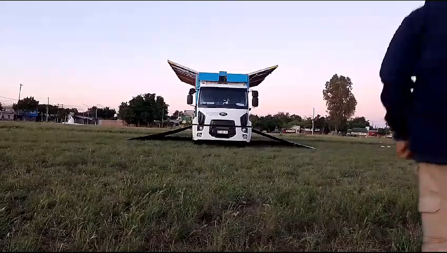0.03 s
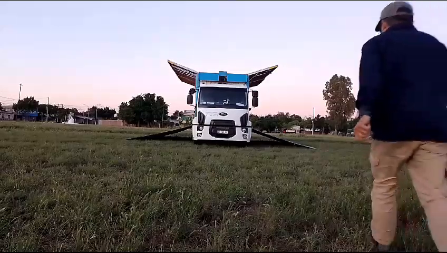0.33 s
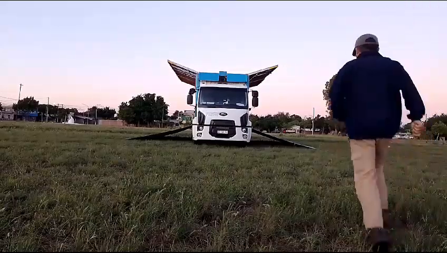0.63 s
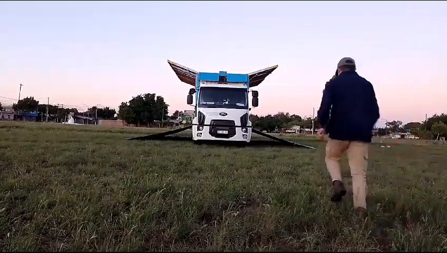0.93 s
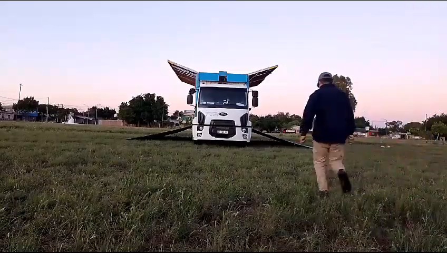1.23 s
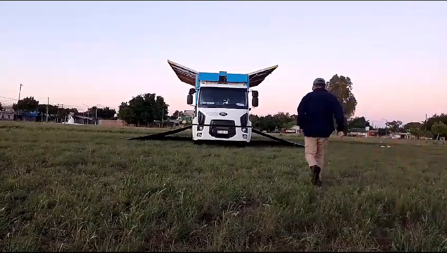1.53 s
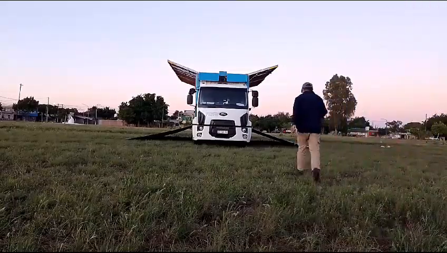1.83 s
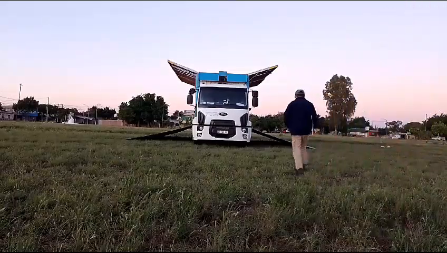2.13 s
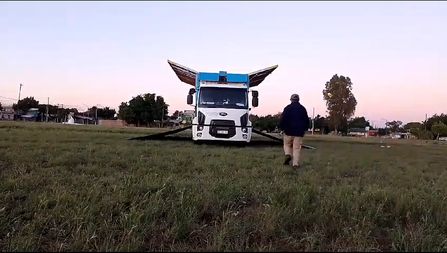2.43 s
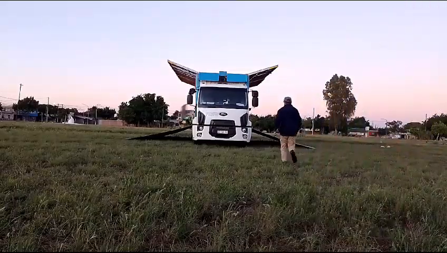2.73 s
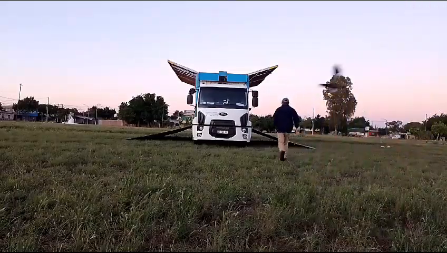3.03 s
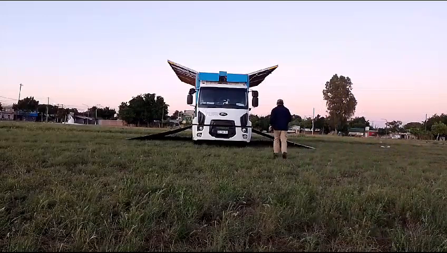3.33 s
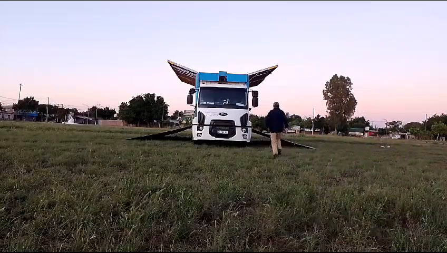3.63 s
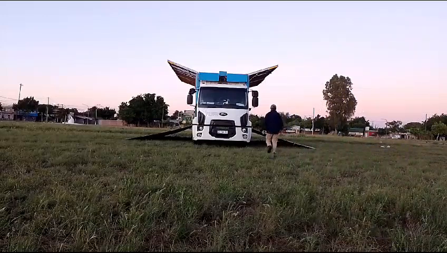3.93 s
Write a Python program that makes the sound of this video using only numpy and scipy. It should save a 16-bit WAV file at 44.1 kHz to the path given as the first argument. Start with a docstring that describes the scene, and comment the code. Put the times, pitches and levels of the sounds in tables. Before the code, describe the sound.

A bird gives repeated harsh, reedy squawks, growing louder and brighter as it nears, while a second bird sometimes overlaps. Faint footsteps swish away through grass early on, in a quiet open field with a slight echo.

```python
"""Two birds squawking over a grass field

Open field, quiet air, one microphone feeding both channels. Two birds squawk; one flies closer and
gets louder and brighter. Each squawk is a reedy stack of harmonics that starts with a fast trill and
a rasp, clears, and drops in pitch at its end. Someone walks away through the grass, and a faint echo
of the birds comes back from the edge of the field."""
import sys
import numpy as np
from scipy import signal
from scipy.fft import rfft, irfft
from scipy.io import wavfile

SR = 44100
rng = np.random.default_rng(int(sys.argv[2]) if len(sys.argv) > 2 else 0)


def persist_wave(psi):
    """Save psi, clipped to +-1, as 16-bit WAV."""
    counts = np.round(np.clip(psi, -1, 1) * 32767).astype(np.int16)
    wavfile.write(sys.argv[1], SR, np.atleast_2d(counts).T)


N = 176400
TIME = np.arange(N) / SR

# Bright spectrum of air in the throat, also of the scatter off the grass: frequency_hz, level_db
HISS_SPECTRUM = [(300,-27),(700,-6),(1400,-25.5),(2200,11),(4000,1.5),(6000,2.5),(10000,9),(15000,-21)]


def from_db(db):
    """Decibels to gain."""
    return 10 ** (np.asarray(db) / 20)


def db_at(spectrum, hz):
    """Level of a spectrum at hz, interpolated on a log-frequency axis."""
    table = np.array(spectrum)
    return np.interp(np.log(hz + 1e-9), np.log(table[:, 0]), table[:, 1])


def noise(spectrum, size=N):
    """Coloured noise of rms 1."""
    gain = from_db(db_at(spectrum, np.fft.rfftfreq(size, 1 / SR)))
    coloured = irfft(rfft(rng.standard_normal(size)) * gain, size)
    return coloured / coloured.std()


def drift(hz, size):
    """Smooth random wander with a spread of about 1, rolling off above hz."""
    hop, settle = 20, 1000
    pole = np.exp(-2 * np.pi * hz * hop / SR)
    white = rng.standard_normal(size // hop + settle + 2)
    smooth = signal.lfilter([1], [1, -2 * pole, pole * pole], white)
    return np.interp(np.arange(size) / hop + settle, np.arange(len(smooth)), smooth / smooth.std())


def phase_of(hz):
    """Running phase in radians of a changing frequency."""
    return 2 * np.pi * np.cumsum(hz) / SR


def open_air():
    """Quiet, steady air over the field, mostly low rumble."""
    # Outdoor background: frequency_hz, level_db
    air_spectrum = [(20,-13),(50,-2),(70,-9.5),(110,-5.5),(160,-19),(240,-13),(600,-13.5),(1400,-13.5),(2300,-14),(4100,-20),(5200,-29),(8600,-23),(12000,-31.5),(16000,-49)]
    return from_db(-69) * noise(air_spectrum)


def bursts(events, spectrum):
    """Short bursts of noise that start at once and die away."""
    envelope = sum(from_db(db) * (TIME >= start_s) * np.exp(-np.minimum(abs(TIME - start_s) / decay_s, 20))
                   for start_s, db, decay_s in events)
    return envelope * noise(spectrum)


def walker():
    """Someone walking off: feet and trousers brush the grass, dry stalks snap, feet land softly."""
    # Swishes through the grass: centre_s, length_s, level_db
    swishes = [(0.024,0.1,-58),(0.13,.09,-60),(0.185,0.22,-56),(.4,0.16,-66.5),(0.504,0.12,-59),(0.66,0.037,-66),(0.745,0.054,-53.5),(.92,0.073,-60),(1.015,0.044,-65.5),(1.145,0.19,-66),(1.694,0.099,-65.5),(1.961,0.041,-53.5),(3.421,0.037,-72)]
    # Brushed grass: frequency_hz, level_db
    grass_spectrum = [(300,-8.5),(1000,-12),(3000,-6),(5500,-8.5),(8500,6.5),(10500,0.5),(13000,-7),(16000,1)]
    # Stalks snapping: start_s, level_db, decay_s
    snaps = [(.07,-49,0.013),(.082,-42,0.0064),(.601,-52,0.0024),(.727,-51.5,0.0059),(.738,-63,0.0046)]
    # Crack of a stalk: frequency_hz, level_db
    snap_spectrum = [(200,-9),(600,-6),(1500,-5),(3500,1.5),(6000,-0.5),(9000,-1),(15000,-16)]
    # Footfalls: start_s, level_db, decay_s
    steps = [(.078,-63,0.018),(.54,-60,0.0086),(1.55,-63,0.0077)]
    # Thud of a foot: frequency_hz, level_db
    step_spectrum = [(100,-18),(300,-7),(520,-2),(900,-9),(3000,-34)]
    swell = sum(from_db(db) * np.exp(-(2 * (TIME - centre_s) / length_s) ** 2)
                for centre_s, length_s, db in swishes)
    grain = from_db(3 * drift(210, N) + 2 * drift(21, N))
    rustle = swell * grain / grain.mean() * noise(grass_spectrum)
    return rustle + bursts(snaps, snap_spectrum) + bursts(steps, step_spectrum)


def field(direct):
    """Direct sound plus quick scatter off nearby grass and a faint, dull echo from trees and houses."""
    # Echo from the edge of the field: frequency_hz, level_db
    echo_spectrum = [(300,-5.5),(800,9.5),(2000,-2.5),(4000,-7.5),(5500,-6),(7000,-15),(10000,-9.5),(16000,-33)]
    scatter_db, scatter_t60_s = -23, .08
    echo_db, echo_t60_s, echo_delay_s = -23.5, .32, .012
    t = TIME[:SR]
    scatter = noise(HISS_SPECTRUM, size=SR) * from_db(-60 * t / scatter_t60_s)
    echo = noise(echo_spectrum, size=SR) * from_db(-60 * t / echo_t60_s) * (t > echo_delay_s)
    response = from_db(scatter_db) * scatter / np.linalg.norm(scatter)
    response += from_db(echo_db) * echo / np.linalg.norm(echo)
    return direct + signal.fftconvolve(direct, response)[:N]


def throat(pitch_hz, colour, treble_db, slack_hz, rough):
    """Sixteen trembling harmonics shaped by throat and beak; they dull as the voice goes slack."""
    # Resonances of throat and beak: frequency_hz, level_db
    throat_spectrum = [(750,-20.5),(1180,-20.5),(1700,-9),(2100,-7),(2380,-6.5),(2900,-2.5),(3400,-4),(4500,-8),(5300,-12.5),(5900,-9),(6700,-16),(7400,-15),(8200,-8.5),(8900,-2),(9600,-6),(10700,-10.5),(12000,-21),(15500,-31.5)]
    hump_centres_hz, hump_widths_hz = (2060, 3900, 5380, 6160), (480, 350, 560, 500)
    dulling_db_per_hz, dulling_corner_hz = .065, 3850
    fundamental_db, *humps_db, top_db = colour
    grid_hz = np.linspace(0, SR / 2, 400)
    shape_db = db_at(throat_spectrum, grid_hz) + top_db * np.clip((grid_hz - 10500) / 2500, 0, 1)
    for hump_db, centre_hz, width_hz in zip(humps_db, hump_centres_hz, hump_widths_hz):
        shape_db += hump_db * np.exp(-((grid_hz - centre_hz) / width_hz) ** 2)
    phase, size = phase_of(pitch_hz), len(pitch_hz)
    harmonics = np.zeros(size)
    for k in range(1, 17):
        hz = k * pitch_hz
        db = np.interp(hz, grid_hz, shape_db) + fundamental_db * (k == 1)
        db += treble_db * np.clip((hz - 6500) / 1000, 0, 1)
        db -= dulling_db_per_hz * slack_hz * np.clip(2 * hz / dulling_corner_hz - 1.6, 0, 1)
        db += 2.2 * drift(20, size)  # slow flicker
        db += (.35 + 4.5 * rough) * np.tanh(drift(110, size))  # fast flutter, deeper in the rasp
        spread = np.pi * k * k / 16  # harmonic phases are spread so the voice is less peaky
        harmonics += np.sqrt(2) * from_db(db) * np.sin(k * phase + spread)
    return harmonics


def squawk(curve, voicing, colour, hiss, puff):
    """One trilling, rasping call with hiss in the throat and a puff of air let out as it ends."""
    attack_s, release_s, held_db = .002, .0059, 10
    trill_hz, trill_fade_s, croak_hz, slack_below_hz = 97, .007, 290, 1068
    hiss_db, puff_db, puff_decay_s, puff_lead_s = -48, -40.5, .026, .006
    trill_s, trill_depth, rasp_peak_s, rasp_width_s, rasp_amount, held_s = voicing
    times_s, *columns = np.transpose(curve)
    start_s, end_s = times_s[0], times_s[-1]
    live = (TIME > start_s - attack_s) & (TIME < end_s + release_s)
    t = TIME[live]
    age, size = t - start_s, len(t)
    pitch_hz, level_db, treble_db = [np.interp(t, times_s, column) for column in columns]
    level_db -= held_db * np.maximum(age, 0) / held_s * (age < held_s)  # sinks, then breaks through
    slack_hz = np.maximum(slack_below_hz - pitch_hz, 0)

    trill_fade = .5 * (1 - np.tanh((age - trill_s) / trill_fade_s))
    trill = -trill_depth * trill_fade * np.cos(phase_of(trill_hz * (1 + .048 * drift(20, size))))
    rough = rasp_amount * np.exp(-((age - rasp_peak_s) / rasp_width_s) ** 2)
    rough += .0011 * slack_hz  # the voice frays as its pitch drops
    # A second, slower vibration chops the voice in the rasp.
    croak = rough * np.sin(phase_of(croak_hz * (1 + .25 * drift(60, size))))
    jitter = .055 * rough * drift(330, size)
    waver = .0022 * drift(45, size)
    pitch_hz *= 1 + trill + .035 * croak + jitter + waver

    breath = from_db(hiss_db) * hiss[live] * (1 + 10 * rough)
    voice = breath + throat(pitch_hz, colour, treble_db, slack_hz, rough)
    fade_in = np.clip((age + attack_s) / (2 * attack_s), 0, 1)
    fade_out = np.clip((end_s + release_s - t) / release_s, 0, 1)
    tremolo = np.exp(11 * trill + .45 * croak)
    voice *= fade_in * fade_out * from_db(level_db) * tremolo
    puff_envelope = np.exp(-abs(TIME - end_s + puff_lead_s) / puff_decay_s)
    call = puff * from_db(level_db.max() + puff_db) * puff_envelope
    beak_low_cut = signal.butter(4, 780, "high", fs=SR, output="sos")
    call[live] += signal.sosfilt(beak_low_cut, voice)
    return call


def birds():
    """Ten squawks of the nearing main bird, three overlapping replies from a second, one lone chip."""
    # Main bird, one curve per squawk: time_s, pitch_hz, level_db, treble_db (above 6.5 kHz)
    curves = [
        [(0.192, 1046, -41, -19), (0.204, 1189, -41, -22), (0.22, 1165, -33, -18), (0.25, 1115, -30.5, -26),
         (0.27, 1091, -31, -22), (0.33, 1011, -34, -18.5), (0.362, 912, -38.5, -23), (0.392, 812, -47.5, -27),
         (0.41, 738, -54, -17)],
        [(0.752, 1050, -35, -27), (0.758, 1145, -48, -18), (0.764, 1164, -38.5, -17), (0.784, 1177, -35, -14.5),
         (0.822, 1159, -29.5, -19.5), (0.85, 1185, -32, -22), (0.872, 1165, -31.5, -9.5),
         (0.912, 1152, -34, -28), (0.926, 1131, -37.5, -18), (0.97, 838, -54.5, -13)],
        [(1.218, 1021, -37, -7), (1.226, 1120, -45, -15), (1.234, 1106, -45, -5), (1.246, 1139, -34.5, -13.5),
         (1.29, 1181, -28, -10.5), (1.336, 1089, -33.5, -17), (1.37, 1094, -34, -16),
         (1.392, 963.0, -38.5, -10), (1.41, 930, -40.5, -17)],
        [(1.742, 1038, -43, -19), (1.76, 1125, -39.5, -13), (1.796, 1106, -31, -19.5), (1.83, 1095, -31.5, -18),
         (1.856, 1083, -31.5, -21.5), (1.9, 1047, -34, -22), (1.916, 940, -40.5, -12), (1.948, 784.0, -47, -10),
         (1.955, 750, -46.5, -2)],
        [(2.01, 1090, -32.5, -21), (2.03, 1155, -29, -10), (2.058, 1181, -25, -7.5), (2.076, 1160, -24, -5.5),
         (2.118, 1091, -25.5, -17), (2.134, 1091, -27.5, -8.5), (2.18, 1055, -29, -3.5),
         (2.2, 1017, -29.5, -5.5), (2.214, 933, -34, -7), (2.238, 768.1, -43.5, 13.5)],
        [(2.25, 1124, -31, -8), (2.262, 1112, -38.5, -12), (2.28, 1157, -31, -12.5), (2.3, 1080, -33, -13),
         (2.334, 1050, -29.5, -14), (2.414, 1124, -30, -14.5), (2.47, 1114, -27.5, -12.5),
         (2.486, 1040, -33.5, -24), (2.51, 768, -51, 10)],
        [(2.61, 1013, -35, -16), (2.622, 1047, -33, -19), (2.64, 1122, -29, -16), (2.72, 1163, -27.5, -11),
         (2.742, 1136, -27, -4.5), (2.764, 1115, -28, -13), (2.774, 1047, -35.5, -10.5),
         (2.788, 910, -43, -9.5), (2.795, 840, -53.5, -7)],
        [(2.969, 1141, -26, -8), (2.991, 1207, -23.5, -6), (3.009, 1199, -18.5, -6), (3.029, 1162, -15.5, -6.5),
         (3.083, 1139, -16.5, -7), (3.139, 1109, -19, -4.5), (3.155, 1020, -21.5, -5.5), (3.185, 779, -35, -11)],
        [(3.452, 1127, -34, -18), (3.466, 1165, -23.5, -12.5), (3.476, 1110, -21, -10),
         (3.492, 1162, -16.5, -3.5), (3.55, 1202, -12, -6), (3.56, 1188, -16.5, -3), (3.62, 1163, -14.5, -3),
         (3.67, 1056, -21, 0), (3.678, 999, -19.5, -3), (3.704, 863, -27.5, 4), (3.72, 766.3, -45, 8)],
        [(3.902, 1084, -36.5, -10), (3.918, 1177, -36, -5), (3.946, 1188, -25.5, -7.5), (3.986, 1197, -23, -2),
         (4.0, 1205, -18.5, -3)],
    ]
    # Trill, rasp and held-back onset of each squawk, timed from its start:
    # trill_s, trill_depth (share of pitch), rasp_peak_s, rasp_width_s, rasp_amount (0-1), held_s
    voicings = [(.02,.04,.015,.008,.3,.001), (.05,.02,.012,.008,.3,.001), (.06,.02,.03,.01,.35,.001),
                (.06,.012,.005,.01,.2,.001), (.035,.035,.015,.012,.45,.001), (.105,.045,.045,.03,.35,.001),
                (.12,.028,.04,.055,.25,.001), (.12,.012,.035,.055,.33,.001), (.05,.025,.035,.018,.85,.0165),
                (.1,.018,.095,.005,.6,.001)]
    # Colour of each squawk as the bird moves and turns:
    # fundamental_db, four hump_db (near 2.1, 3.9, 5.4, 6.2 kHz), top_db (above 10.5 kHz)
    colours = [(-22,-5.5,2.5,-8,-21.5,-12), (-19,-2.5,5,-5,-11,-20), (-6,3.5,-1,6.5,-5.5,-7),
               (-17.5,-9.5,5.5,-1.5,-12,4), (0,-1.5,4.5,1.5,-3,-3), (-18,-5.5,3,-4.5,2.5,0),
               (-6.5,-1,-6,4,0,-8), (-5.5,-5.5,2,3.5,-3,0), (-2,-4.5,2,3.5,-0.5,5), (6,-0.5,2,8,7,-2)]
    # Second bird's three replies and the short lone chip at 2.843 s: time_s, pitch_hz, level_db, treble_db
    side_curves = [
        [(.812,985,-44,-17),(.83,1120,-42.5,-27),(.86,1022,-43,-19),(.89,900,-62,-12)],
        [(1.318,920,-50,-18),(1.335,1015,-38.5,-13),(1.41,945,-42,-13),(1.428,988,-38.5,-13),(1.452,757,-48,-21)],
        [(2.843,940,-53,-14.5),(2.847,994,-32.5,-10.5),(2.854,934,-46.5,-15.5)],
        [(3.0,1183,-37,-4.5),(3.08,1153,-33.5,-13),(3.16,1092,-29.5,-2.5),(3.222,1041,-34.5,-6),(3.255,829,-43,-8)],
    ]
    # Trill and rasp of the replies and the chip: columns as in voicings
    side_voicing = (.02,.008,.005,.008,.1,.001)
    # Colour of the replies and the chip: columns as in colours
    side_colour = (-7.5,1,5.5,2,-2.5,-5.5)
    # Air let out at the end of a squawk: frequency_hz, level_db
    puff_spectrum = [(100,-24.5),(300,-16),(500,-3),(750,-2.5),(1200,-3),(3000,-19.5)]
    hiss, puff = noise(HISS_SPECTRUM), noise(puff_spectrum)
    main_calls = sum(squawk(*call, hiss, puff) for call in zip(curves, voicings, colours))
    side_calls = sum(squawk(curve, side_voicing, side_colour, hiss, puff) for curve in side_curves)
    return main_calls + side_calls


def scene():
    """Birds over the field, the walker and open air, the same in both channels."""
    mono = field(birds()) + walker() + open_air()
    return np.array([mono, mono])


def record(dry):
    """The recorder cuts the top off steeply."""
    cutoff_hz = 15900
    return signal.sosfilt(signal.ellip(12, .1, 80, cutoff_hz, fs=SR, output="sos"), dry)


dry = scene()
out = record(dry)
persist_wave(out)
```